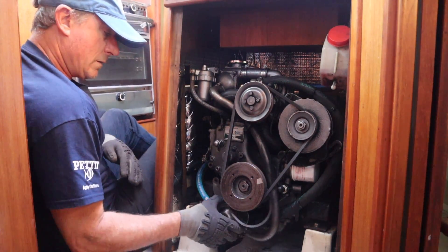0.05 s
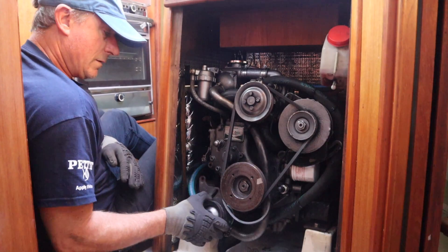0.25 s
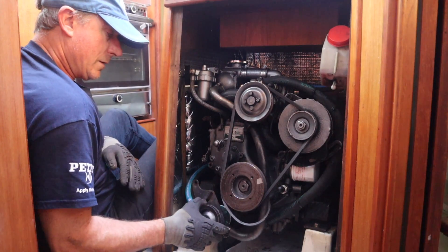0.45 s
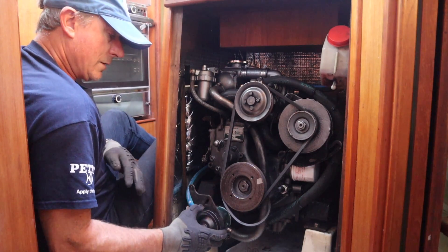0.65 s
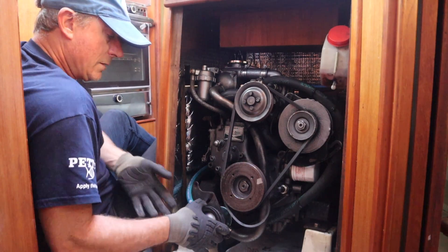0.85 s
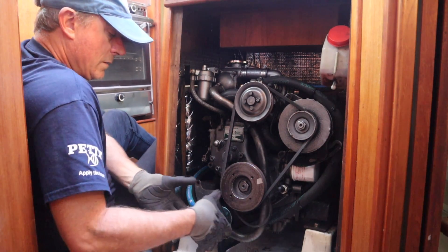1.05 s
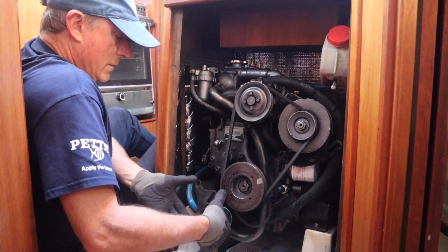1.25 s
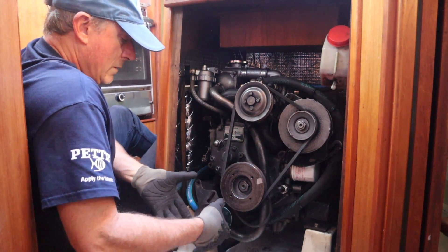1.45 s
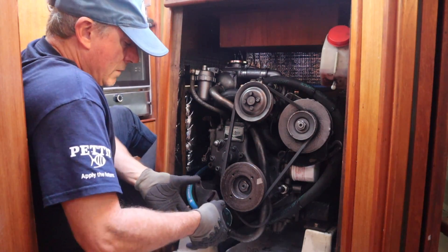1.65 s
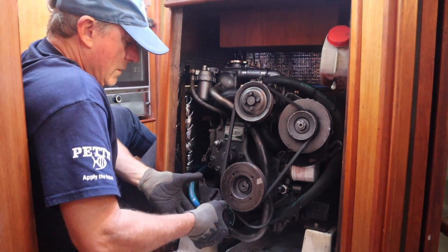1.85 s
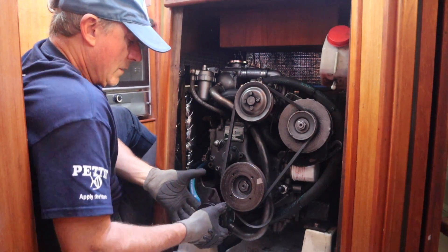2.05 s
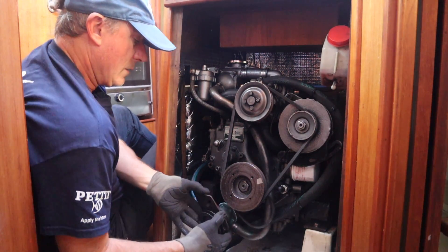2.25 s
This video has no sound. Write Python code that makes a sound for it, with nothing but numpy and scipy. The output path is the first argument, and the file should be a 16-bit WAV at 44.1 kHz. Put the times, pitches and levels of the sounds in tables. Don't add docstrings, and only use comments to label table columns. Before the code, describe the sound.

One loud low floor knock with rattle and bounces, followed by quiet belt rubbing beside an engine

```python
import sys
import numpy as np
from scipy import signal
from scipy.fft import rfft, irfft, next_fast_len
from scipy.io import wavfile
from scipy.ndimage import uniform_filter1d, map_coordinates

SR = 44100
rng = np.random.default_rng(int(sys.argv[2]) if len(sys.argv) > 2 else 0)


def nominal_scale(level):
    x = np.asarray(level, float) / 20
    return 10 ** x


def master_out(mix):
    frames = np.transpose(np.atleast_2d(mix))
    ceiling = np.clip(frames, -1, 1)
    pcm = np.round(ceiling * 32767).astype(np.int16)
    wavfile.write(sys.argv[1], SR, pcm)


N = 101429

# (frequency [Hz], side over mid [dB])
STEREO_WIDTH = [(60, -35), (110, -19), (200, -6), (350, -2.5), (640, -1.5), (1150, 0.5), (2070, 3),
                (3740, 6.5), (6760, 8), (12200, 11.5)]
# (frequency [Hz], t60 [s])
CABIN_T60 = [(150, 0.4), (2000, 0.17), (10000, 0.1)]
# (frequency [Hz], density [dB per Hz])
HUM_SPECTRUM = [(12, -40), (24, -4), (40, -5.5), (75, -1.5), (124, -8.5), (170, -15.5), (300, -23),
                (500, -53)]
# (time [s], level [dB])
HUM_SWELL = [(0, -50.5), (.22, -48), (.6, -41.5), (.75, -45.5), (.95, -41), (1.15, -41.5), (1.3, -47.5),
             (1.45, -43), (1.7, -49), (1.8, -46), (1.9, -47.5), (2.0, -43), (2.1, -47.5), (2.3, -42)]
# (frequency [Hz], density [dB per Hz])
AIR_SPECTRUM = [(90, -7.5), (150, -5.5), (500, -8), (1700, -17), (5000, -30), (11000, -36), (13000, -53),
                (16000, -85)]
# (start [s], rise [s], hold [s], fall [s], level [dB])
SCUFF_STROKES = [
    (.09, 0.068, 0.097, 0.018, -53),
    (.47, .01, .03, .05, -57),
    (.78, 0.045, 0.047, 0.099, -56),
    (.96, 0.01, 0.16, 0.084, -53),
    (1.18, 0.05, .1, 0.06, -47),
    (1.34, .03, .04, .03, -49),
    (1.735, 0.015, 0.027, 0.058, -50),
    (1.94, 0.018, 0.034, 0.055, -54.5),
    (2.12, .03, .05, .03, -54),
    (2.21, 0.016, 0.074, .02, -47.5),
]
# (frequency [Hz], density [dB per Hz])
SCUFF_SPECTRUM = [(200, -40), (500, 1), (1000, 2.5), (2000, -1), (5000, -10.5), (11000, -16), (13000, -27),
                  (16000, -70)]
# (start [s], rise [s], hold [s], fall [s], level [dB])
CASING_DRAGS = [
    (1.98, 0.013, .027, 0.042, -39.5),
    (2.115, 0.0032, 0.0073, .025, -41),
    (2.2, 0.066, 0.015, 0.03, -33),
]
# (frequency [Hz], width [Hz], level [dB])
CASING_MODES = [(266, 105, 2), (410, 73, 5.5), (583, 180, -2), (900, 100, 4), (1443, 73, -7)]
# (time [s], frequency [Hz], level [dB], t60 [s])
HULL_PUSHES = [
    (1.416, 146.5, -35.5, 0.11),
    (1.40, 220.3, -41.5, 0.55),
    (1.971, 98.4, -26.5, 0.093),
    (2.119, 140, -34.5, 0.1),
    (2.125, 220, -28.5, 0.056),
    (2.15, 227, -29.5, 0.055),
    (2.202, 109, -27.5, 0.12),
    (2.25, 126, -29, 0.25),
    (2.285, 126, -26, .2),
]
# (time [s], level [dB], pitch [Hz], t60 [s])
CONTACTS = [(.119, -45.5, 4250, 0.018), (.1272, -37, 1950, 0.028), (0.1287, -41, 1330, 0.029),
            (0.149, -50.5, 5900, 0.1), (0.215, -41.5, 7340, 0.035), (.229, -42, 7400, .012),
            (.3572, -32.5, 2080, 0.015), (0.354, -46, 4400, 0.022), (0.3637, -45, 6750, .015),
            (0.364, -40.5, 2540, 0.018), (0.367, -29, 1950, 0.017), (.3675, -44, 4500, 0.014),
            (.373, -44, 2300, .03), (0.4764, -47.5, 5560, 0.096), (1.555, -43.5, 4470, 0.016),
            (1.555, -41, 3000, 0.029), (1.5598, -36.5, 4300, .012), (1.5603, -41.5, 10700, 0.018),
            (1.5605, -41, 7800, .015), (1.565, -45.5, 9300, 0.023), (1.6813, -51, 9540, 0.034),
            (1.7534, -49, 5030, 0.047), (1.884, -53, 7460, 0.029), (1.957, -50.5, 8040, 0.035),
            (1.9625, -43, 4600, 0.019), (1.965, -45, 6500, 0.015), (1.965, -54, 13600, 0.035),
            (2.053, -41, 1960, .05), (2.051, -58, 9600, .04), (2.1144, -33.5, 3730, 0.011),
            (2.1156, -45, 8000, 0.02), (2.115, -51, 6400, .012), (2.2345, -32.5, 4760, 0.013),
            (2.2755, -40, 4670, .014), (2.2745, -43, 3270, 0.027)]
# (time [s], frequency [Hz], level [dB], t60 [s])
PULLEY_RINGS = [(.146, 4460, -44, .12), (.1575, 4490, -43, .22), (.149, 8790, -60, .4),
                (.149, 11220, -62, .4), (.16, 6630, -62, .3), (.216, 6630, -53, .1), (.217, 7530, -51, .07),
                (.216, 11220, -56, .12), (.375, 4420, -50, .17), (1.02, 7520, -58, .2),
                (1.037, 6630, -58, .3), (1.03, 11280, -62, .2), (1.107, 7520, -59, .1),
                (1.107, 11280, -62, .1), (1.585, 8180, -57, .3), (1.69, 8120, -63, .2),
                (1.70, 11280, -63, .25), (1.76, 8790, -58, .35), (1.76, 11280, -59, .4),
                (2.13, 8120, -61, .35)]
# (frequency [Hz], level [dB], t60 [s], rise [s])
FLOOR_MODES = [(65.9, -7.5, 1.04, 0.018), (72.8, -6.5, 0.62, 0.044), (95.2, -1.5, 0.66, 0.059),
               (103.9, 2.5, 0.43, 0.029), (118.5, -8, .2, 0.035), (137.3, 4.5, 0.32, 0.0064),
               (152.2, -7.5, 0.47, 0.017), (164.64, 3, 0.32, 0.0046), (188, -5, 0.35, 0.037),
               (228, -7, 0.23, .01), (318, -16, 0.26, 0.027), (390, -13, 0.25, 0.0025),
               (481, -3, 0.065, 0.0026), (170, 4, 0.072, 0.0024)]
# (frequency [Hz], level [dB], t60 [s])
PART_MODES = [(564, -18.5, 0.197), (758, -16, .081), (883, -15, 0.058), (1131, -15.5, 0.079),
              (1895, -14, .035), (2577, -13, 0.031), (3150, -9, 0.022), (4250, -11.5, 0.019)]
# (frequency [Hz], density [dB per Hz])
RATTLE_SPECTRUM = [(150, -31), (300, 3), (600, 4.5), (1200, -6), (2200, -10), (4000, -25), (10000, -36),
                   (14000, -65)]
# (start [s], rise [s], hold [s], fall [s], level [dB])
SECOND_LANDING = [
    (.252, 0.0063, 0.009, 0.012, -30),
]
# (time [s], frequency [Hz], level [dB], t60 [s], rise [s])
BOUNCES = [
    (.335, 165.5, -3, .15, 0.0013),
    (.335, 195, -11.5, 0.31, 0.0049),
    (.405, 178, -14.5, 0.31, 0.0068),
    (0.44, 172, -19, .25, 0.0041),
]

KNOCK_S, KNOCK_DB, BOOM_LAG_S = 0.2369, -9, 0.00323
CRACK_DB, CRACK_HZ, CRACK_T60_S = -9.5, 3000, 0.022
RATTLE_DB, RATTLE_T60_S, LANDING_HZ = -16, 0.3, 2250
WAVER_DB, WAVER_S = 3, 0.12
GRAIN_DB, GRAINS_PER_S = 2, 900
TICK_WIDTH = 0.22
TICK_BROAD_DB, TICK_GRIT_DB = -15, -5
TICK_RING_T60_S = 0.02
FLUTTER_DB, PULLEY_MID_DB, PULLEY_SIDE_DB = 2.5, -6, -1
CABIN_DB, DIRECT_SIDE_DB = -10, -19
LEAD_DB = -14.5
DUCK_DB, DUCK_HOLD_S, RECOVER_S = -1.5, 0.38, 0.5
AIR_DB, MIC_TOP_HZ = -47, 12300


def unit(x):
    return x / np.sqrt(np.mean(x ** 2) + 1e-20)


def along(points, hz):
    f, v = np.transpose(points)
    return np.interp(np.log(hz + 1), np.log(f + 1), v)


def filtered(x, response):
    m = next_fast_len(x.shape[-1] + 8192)
    spectrum = rfft(x, m) * response(np.fft.rfftfreq(m, 1 / SR))
    return irfft(spectrum, m)[..., :x.shape[-1]]


def peak(f, hz, width_hz):
    return 1j * f * width_hz / (hz * hz - f * f + 1j * f * width_hz)


def wobble(rate):
    knots = rng.standard_normal(int(N * rate / SR) + 4)
    return map_coordinates(knots, [np.arange(N) * rate / SR])


def since(s):
    return np.maximum(np.arange(N) / SR - s, 0)


def burst(s, db, t60, rise=0.00038):
    t = since(s)
    return nominal_scale(db - 60 * t / t60) * (1 - np.exp(-t / rise))


def ring(s, hz, db, t60, rise=0.00069):
    return np.sin(2 * np.pi * hz * since(s)) * burst(s, db, t60, rise)


def strokes(rows):
    t = np.arange(N) / SR
    envelope = np.zeros(N)
    for start, rise, hold, fall, db in rows:
        shape = np.interp(t, np.cumsum([start, rise, hold, fall]), [0, 1, 1, 0])
        envelope += nominal_scale(db) * np.sin(np.pi / 2 * shape) ** 2
    return envelope


def lead(x):
    return np.roll(x, shift=-2) - np.roll(x, shift=2)


def widened(f):
    return nominal_scale([0 * f, along(STEREO_WIDTH, f)])


def wide(spectrum, patchy_db, grain_db=0):
    z = signal.stft(rng.standard_normal((2, N)), nperseg=512)[2]
    field = uniform_filter1d(rng.standard_normal(z.shape[1:]), size=6, axis=0)
    field = uniform_filter1d(field, size=10, axis=1)
    noise = signal.istft(z * nominal_scale(patchy_db * unit(field)), nperseg=512)[1][:, :N]
    mid, side = noise * nominal_scale(grain_db * wobble(GRAINS_PER_S))
    side = 0.96 * side + nominal_scale(LEAD_DB) * lead(mid)
    pair = filtered(np.array([mid, side]), lambda f: nominal_scale(along(spectrum, f)) * widened(f))
    return pair / np.std(pair[0])


def cabin(x):
    hz, t, z = signal.stft(rng.standard_normal((2, SR // 3)), SR, nperseg=256)
    decay_db = -60 * t / along(CABIN_T60, hz)[:, None]
    tail = signal.istft(z * nominal_scale(decay_db), SR, nperseg=256)[1]
    delayed = np.pad(x, (90, 0))[None]
    wet = signal.fftconvolve(delayed, tail / np.linalg.norm(tail[0]), axes=1)[:, :N]
    direct = np.array([x, nominal_scale(DIRECT_SIDE_DB) * lead(x)])
    return filtered(nominal_scale(CABIN_DB) * wet + direct, widened)


def background():
    swell_db = np.interp(np.arange(N) / SR, *np.transpose(HUM_SWELL))
    hum = wide(HUM_SPECTRUM, patchy_db=1.0) * nominal_scale(swell_db + 1.8 * wobble(12.0))
    air = wide(AIR_SPECTRUM, patchy_db=1.0) * nominal_scale(AIR_DB + 1.16 * wobble(3.55))
    return hum + air


def casing(f):
    modes = sum((-1) ** k * nominal_scale(db) * peak(f, hz, width) for k, (hz, width, db) in enumerate(CASING_MODES))
    return (modes + 0.18 * peak(f, 1380, 3200) ** 2) / (1 + 1j * f / 4000)


def belt():
    scuff = wide(SCUFF_SPECTRUM, patchy_db=-0.5, grain_db=GRAIN_DB)
    scuff = scuff * strokes(SCUFF_STROKES) * nominal_scale(0.69 * wobble(25.2))
    slips = rng.standard_normal(N) * nominal_scale(0.89 * wobble(250))
    drag = cabin(unit(filtered(slips, casing)) * strokes(CASING_DRAGS))
    push = sum(ring(*row, rise=0.002) for row in HULL_PUSHES)
    return scuff + drag + push * nominal_scale([[0], [-30]])


def ticks():
    out = np.zeros((2, N))
    for s, db, hz, t60 in CONTACTS:
        noise = rng.standard_normal(N)
        pitched = unit(filtered(noise, lambda f: peak(f, hz, TICK_WIDTH * hz)))
        broad = unit(filtered(noise, lambda f: peak(f, 4000, 9000)))
        grit = (pitched + nominal_scale(TICK_BROAD_DB) * broad) * burst(s, db + TICK_GRIT_DB, t60, 0.00035)
        tone = ring(s, hz, db - 0.5, min(t60, TICK_RING_T60_S), 0.00085)
        out += cabin(tone + grit)
    return out


def pulley():
    lines = [ring(*row, rise=0.00047) * nominal_scale(FLUTTER_DB * wobble(90)) for row in PULLEY_RINGS]
    both = cabin(sum(lines[::2])) + cabin(sum(lines[1::2]))
    return both * nominal_scale([[PULLEY_MID_DB], [PULLEY_SIDE_DB]])


def knock():
    crack = unit(filtered(rng.standard_normal(N), lambda f: peak(f, CRACK_HZ, 1130)))
    crack = crack * burst(KNOCK_S, CRACK_DB, CRACK_T60_S, 0.0017)
    landing = unit(filtered(rng.standard_normal(N), lambda f: peak(f, LANDING_HZ, 1400) ** 2))
    landing = landing * strokes(SECOND_LANDING)
    part = sum(ring(KNOCK_S, *mode) for mode in PART_MODES)
    part = np.array([part, 0.7 * lead(part)])
    rattle = wide(RATTLE_SPECTRUM, patchy_db=3, grain_db=GRAIN_DB / 2)
    rattle = rattle * burst(KNOCK_S, RATTLE_DB, RATTLE_T60_S, 0.0018) * nominal_scale([[0], [-4]])
    waver_db = WAVER_DB * np.minimum(since(KNOCK_S) / WAVER_S, 1) ** 2
    boom = sum(ring(*row) for row in BOUNCES)
    for mode in FLOOR_MODES:
        boom = boom + ring(KNOCK_S + BOOM_LAG_S, *mode) * nominal_scale(waver_db * wobble(21.95))
    return nominal_scale(KNOCK_DB) * (cabin(crack + landing) + part + rattle - boom * nominal_scale([[0], [-38]]))


def ducking():
    t = since(KNOCK_S)
    recovery = np.maximum(t - DUCK_HOLD_S, 0) / RECOVER_S
    return nominal_scale(DUCK_DB * (t > 0) * np.exp(-recovery ** 2))


def scene():
    mid, side = ducking() * background() + belt() + ticks() + pulley() + knock()
    return np.array([mid + side, mid - side])


def roll_off(x):
    return signal.sosfilt(signal.butter(12, 14500, fs=SR, output="sos"), x)


def record(dry):
    heard = filtered(dry, lambda f: 1 / np.sqrt(1 + (f / MIC_TOP_HZ) ** 10))
    mix = np.clip(heard, -1, 1)
    return roll_off(mix)


dry = scene()
out = record(dry)
master_out(out)
```